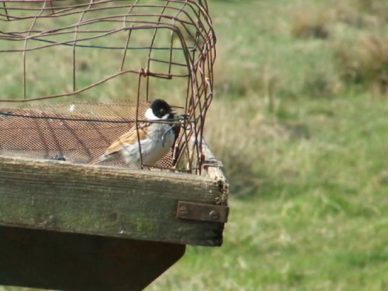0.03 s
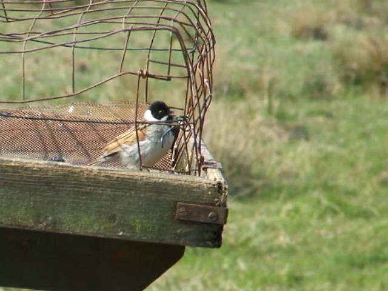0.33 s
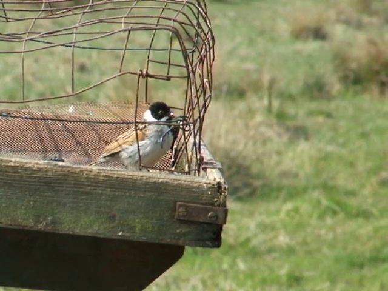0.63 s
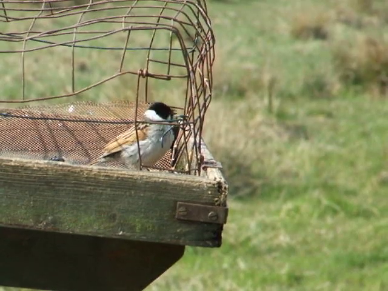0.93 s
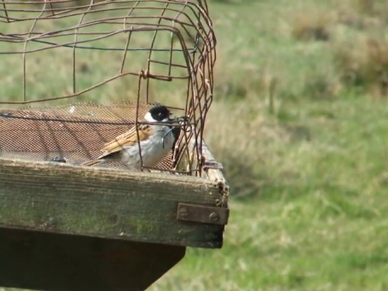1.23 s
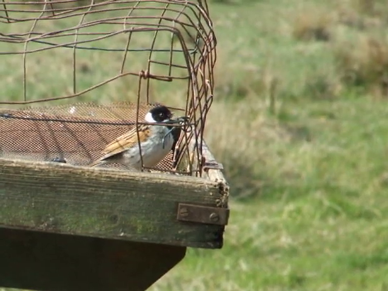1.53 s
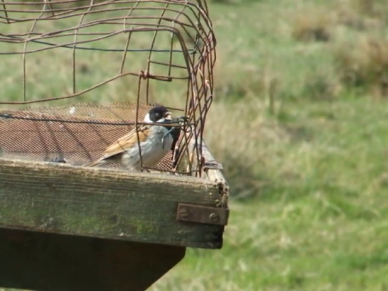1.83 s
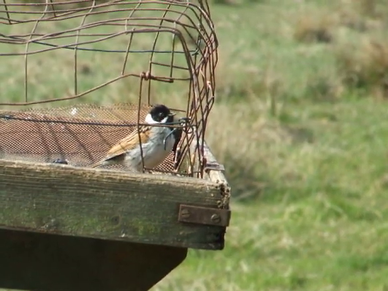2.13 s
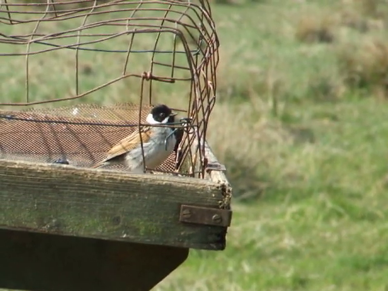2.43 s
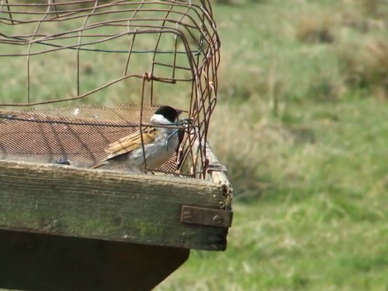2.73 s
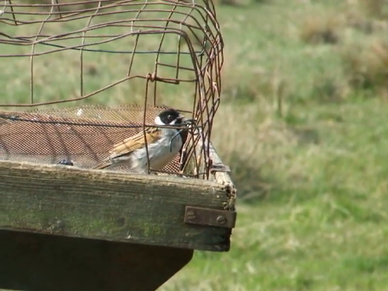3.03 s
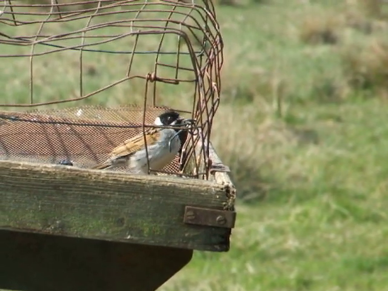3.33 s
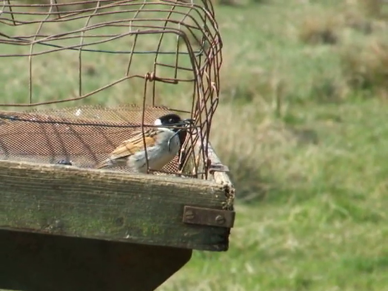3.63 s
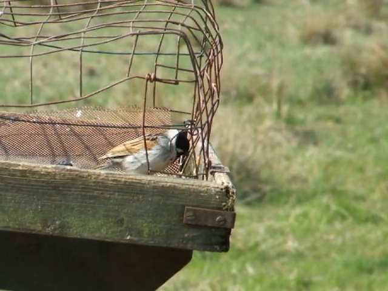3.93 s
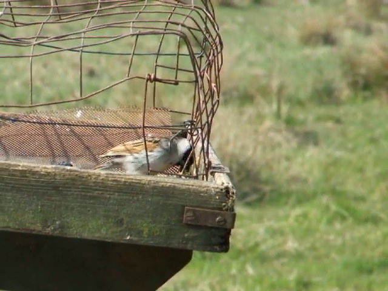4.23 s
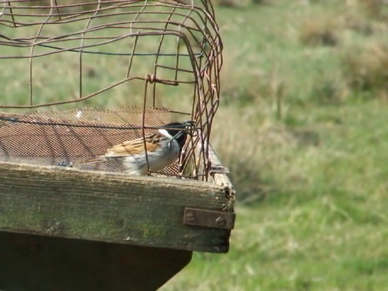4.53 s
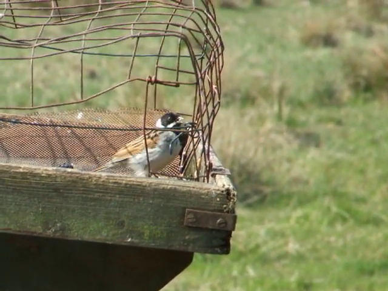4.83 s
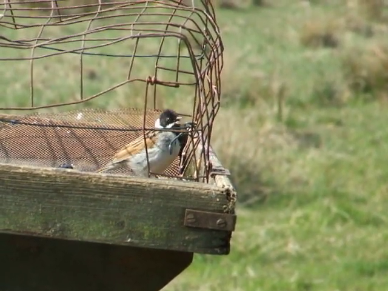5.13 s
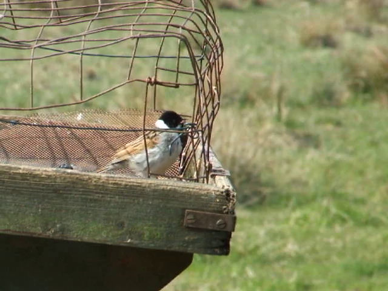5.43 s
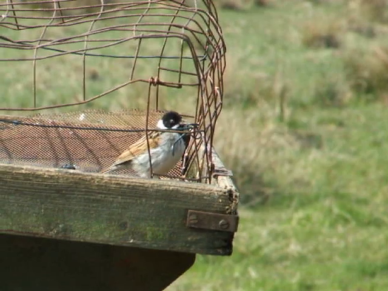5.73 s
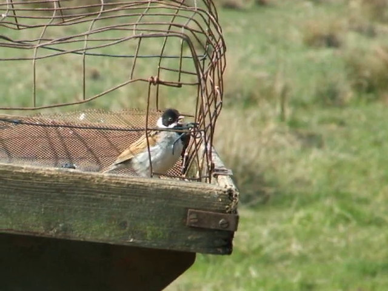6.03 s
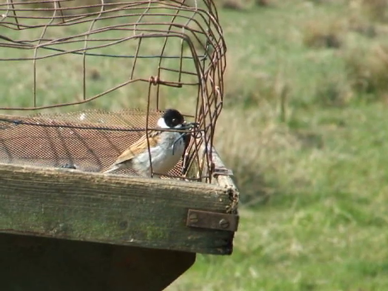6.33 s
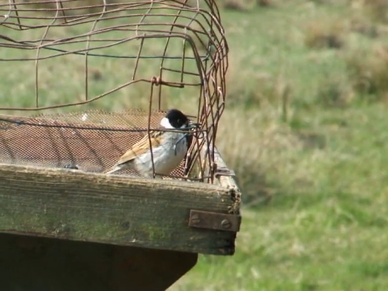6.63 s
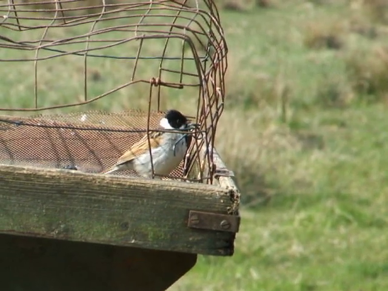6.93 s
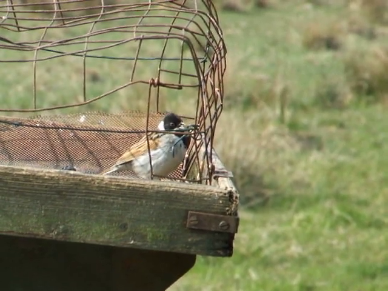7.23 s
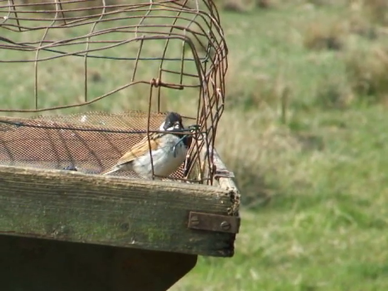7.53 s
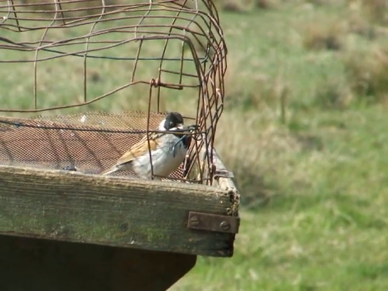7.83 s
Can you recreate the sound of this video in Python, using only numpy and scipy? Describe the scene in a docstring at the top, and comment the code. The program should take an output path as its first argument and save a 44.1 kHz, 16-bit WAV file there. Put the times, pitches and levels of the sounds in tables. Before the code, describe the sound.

In an open grassy field, a small bird sings high whistles, a fast trill and a run of rising notes, then a quieter phrase joined by a distant bird. A few short, dry taps sound near the microphone, the loudest at the very start and just before the middle. Low wind rumble swells and eases beneath a steady hiss, with a very faint high whine from the small camera.

```python
"""A small songbird sings across a pasture in frequency-modulated tones: thin whistles, a quick trill,
rising notes, then a softer phrase, joined by a farther bird. Ground and tussocks scatter the song.
Open air and dry grass give broadband noise, and light gusts rumble on the microphone. A few sharp taps,
damped impacts, sound close by. A small camera picks it all up with a narrow band, a faint electronic
whine and the quantisation hiss of a coarse converter."""
import sys
import numpy as np
from scipy import signal
from scipy.fft import rfft, irfft, next_fast_len
from scipy.io import wavfile
from scipy.ndimage import map_coordinates

SR = 44100
rng = np.random.default_rng(int(sys.argv[2]) if len(sys.argv) > 2 else 0)


def waveform_to_disk(signal):
    """Save audio, clipped to [-1, 1], as 16-bit WAV at the path in sys.argv[1]."""
    frames = np.transpose(np.atleast_2d(signal))
    scaled = np.clip(frames, -1, 1) * 32767
    samples = np.round(scaled).astype(np.int16)
    wavfile.write(sys.argv[1], SR, samples)


N = 347508

# The falling syllable of both trills, before stretching: time_s, pitch_hz, relative_db
SLUR_CONTOUR = [(0, 5347, -10), (.004, 4951, -5), (.0075, 4523, 4), (.014, 4214, 0), (.02, 4000, -7),
                (.026, 3902, -10)]


def amp(db):
    """Decibels to an amplitude ratio."""
    return 10 ** (np.asarray(db) / 20)


def unit(x):
    """Normalisation to rms 1."""
    return x / np.sqrt(np.mean(x ** 2) + 1e-20)


def along(points, hz):
    """Interpolation of (frequency_hz, value) points on a logarithmic frequency axis."""
    knots_hz, values = np.transpose(points)
    return np.interp(np.log(hz + 1), np.log(knots_hz + 1), values)


def curves(rows, size=N):
    """Linear interpolation, sample by sample, of each column after the time."""
    times, *columns = np.transpose(rows)
    return [np.interp(np.arange(size) / SR, times, column) for column in columns]


def wobble(rate_hz, size=N):
    """Smooth random modulation: a spline through rate_hz Gaussian values a second."""
    knots = rng.standard_normal(int(size * rate_hz / SR) + 4)
    return map_coordinates(knots, [np.arange(size) * rate_hz / SR])


def filtered(x, response):
    """Zero-phase filtering: the spectrum is multiplied by a frequency response."""
    size = next_fast_len(len(x) + 8192)
    return irfft(rfft(x, size) * response(np.fft.rfftfreq(size, 1 / SR)), size)[:len(x)]


def noise(spectrum):
    """White noise shaped to a spectrum, at rms 1."""
    return unit(filtered(rng.standard_normal(N), lambda hz: amp(along(spectrum, hz))))


def add(track, start_s, sound):
    """Superposition of a sound on a track."""
    part = track[max(round(start_s * SR), 0):][:len(sound)]
    part += sound[:len(part)]


def progress(length_s):
    """Normalised time, 0 to 1 over a note."""
    return np.linspace(0, 1, int(length_s * SR))


def field(still_db=-57):
    """Amplitude-modulated noise: the far rush of open air and the flicker of rustling dry grass."""
    # Spectra of the air and the grass: frequency_hz, relative_density_db
    air_spectrum = [(60, -20), (160, -1), (215, -7), (350, -2), (430, -6.5), (800, -1.5), (980, -2),
                    (1130, -4.5), (1400, -4.5), (1680, -13), (2250, -11), (3300, -21.5), (5500, -27),
                    (7900, -36.5)]
    grass_spectrum = [(1000, -32.5), (2200, 0), (3300, -1), (4500, 0), (5700, -0.5), (7200, 3.5),
                      (7900, 0.5)]
    # Their slow envelopes: time_s, relative_db
    rush_levels = [(0.0, -51.5), (1.56, -52.5), (5.64, -52), (6.67, -54), (7.88, -52.5)]
    rustle_levels = [(0.0, -53.5), (0.46, -53.5), (1.21, -52.5), (2.35, -53.5), (2.92, -50), (4.39, -54),
                     (5.05, -52), (6.71, -56), (7.88, -56.5)]
    rush = amp(curves(rush_levels)[0] + 2 + .3 * wobble(6)) * noise(air_spectrum)
    stir_power = np.maximum(amp(curves(rustle_levels)[0]) ** 2 - amp(still_db) ** 2, 0)
    rustle = np.sqrt(stir_power) * amp(2.5 + wobble(110)) * noise(grass_spectrum)
    return rush + rustle


def wind(eddy_db=1.1842, flutter_db=1.5):
    """Turbulent pressure on the microphone: breeze and gusts add in power; gusts buffet higher up."""
    # The breeze between gusts: time_s, level_db
    breeze_levels = [(0, -50.5), (.9, -51), (1.35, -47.5), (1.7, -49), (2.2, -46), (2.8, -48), (3.2, -46),
                     (3.7, -50), (4.2, -50), (4.6, -52), (5.2, -50), (6.1, -51), (6.9, -49), (7.88, -50)]
    # Gaussian gusts: peak_s, sigma_s, level_db
    gusts = [(1.338, 0.032, -50.5), (1.581, 0.0383, -51), (1.768, .05, -45), (1.959, .1, -43.5),
             (2.431, .035, -49), (2.581, .1, -56), (3.07, 0.04, -51.5), (3.328, 0.0477, -46),
             (3.425, 0.032, -43.5), (3.51, .015, -45.5)]
    # Spectra of the low rumble and the higher buffeting: frequency_hz, relative_density_db
    rumble_spectrum = [(10, 0.5), (25, -0.5), (55, 1), (100, -3), (140, -13.5), (220, -17.5), (400, -42),
                       (900, -82.5)]
    buffet_spectrum = [(40, -20.5), (100, -1.5), (180, -0.5), (280, -3.5), (390, -9), (500, -24),
                       (900, -37.5), (2000, -73)]
    t = np.arange(N) / SR
    breeze = amp(curves(breeze_levels)[0] + eddy_db * wobble(9))
    swells = (amp(db) * np.exp(-.5 * ((t - peak_s) / sigma_s) ** 2) for peak_s, sigma_s, db in gusts)
    gust = np.sqrt(sum(swell ** 2 for swell in swells))
    rumble = np.hypot(breeze, amp(-.5) * gust) * noise(rumble_spectrum)
    buffet = np.hypot(amp(-18) * breeze, gust) * amp(flutter_db * wobble(25)) * noise(buffet_spectrum)
    return rumble + buffet


def tone(hz, db, taper, waver=.0095, flutter_db=2.7):
    """A soft-ended sinusoid with slight random frequency and amplitude modulation."""
    size = len(hz)
    pitch_hz = hz * (1 + waver * wobble(400, size))
    flutter = unit(amp(flutter_db * wobble(260, size)))
    envelope = signal.windows.tukey(size, taper) * amp(db) * flutter
    return np.sqrt(2) * envelope * np.sin(2 * np.pi * np.cumsum(pitch_hz) / SR)


def whistles(crest=.36, settle=.29, scoop_s=.026):
    """Frequency modulation shapes the bird's single notes; crest and settle are shares of a note."""
    # Thin parabolic arches: start_s, length_s, top_hz, droop_hz, relative_db
    arches = [(.125, 0.1083, 7655, 617.2, -51.5), (.305, 0.0933, 7773, 722, -50),
              (0.439, .125, 7758, 620, -53.5), (3.908, .064, 7171, 852.2, -48.5),
              (4.554, .07, 7501, 150.8, -55.5), (4.745, 0.0655, 7097, 249.9, -47.5),
              (4.867, .09, 7130, 900.3, -49), (5.269, .125, 7565, 603.8, -52.5),
              (5.438, .12, 7638, 450, -57.5), (5.62, .1, 7590, 394.5, -58.5)]
    # Exponential falls towards a held pitch: start_s, length_s, held_hz, fall_hz, relative_db
    sighs = [(.598, 0.1085, 5098, 699.3, -48), (.888, 0.0794, 4282, 661.8, -47),
             (2.018, .095, 3763, 928.7, -49.5), (2.168, 0.0493, 5685, 1098, -45.5),
             (2.858, .1, 3751, 978.7, -47), (5.793, 0.09, 4994, 560, -55.5)]
    # Dips that climb again: start_s, length_s, first_hz, lowest_hz, last_hz, relative_db
    scoops = [(1.829, .128, 7450, 6402, 7026, -44.5), (3.005, .09, 7420, 6859, 7915, -43.5),
              (4.426, .056, 5950, 5737, 6304, -54)]
    # Linear sweeps, steep to nearly level: start_s, length_s, first_hz, last_hz, relative_db
    glides = [(.014, 0.0582, 3960, 4285, -49.5), (0.25, 0.024, 5210, 5231, -54.5),
              (0.731, .045, 6339, 6364, -43), (0.786, 0.0587, 6343, 6614, -45),
              (1.015, .049, 7143, 5400, -44.5), (3.19, .066, 6079, 4169, -46.5),
              (4.007, .039, 5807, 4100, -48.5), (4.388, .025, 5400, 4692, -55),
              (4.666, .06, 4259, 4162, -58), (4.78, .055, 4322, 4290, -54), (4.82, .045, 6026, 5938, -57.5),
              (5.104, .067, 5980, 6127, -55), (5.184, .05, 4025, 4226, -55), (5.405, .045, 4860, 5380, -55)]
    song = np.zeros(N)
    for start_s, length_s, top_hz, droop_hz, db in arches:
        u = progress(length_s)
        pitch_hz = top_hz - droop_hz * ((u - crest) / (1 - crest)) ** 2
        add(song, start_s, tone(pitch_hz, db + 6 * (u - .5), taper=.3))
    for start_s, length_s, held_hz, fall_hz, db in sighs:
        u = progress(length_s)
        pitch_hz = held_hz + fall_hz * np.exp(-u / settle)
        add(song, start_s, tone(pitch_hz, db - 2 * (u - .5), taper=.2, waver=.009))
    for start_s, length_s, first_hz, lowest_hz, last_hz, db in scoops:
        u, bottom = progress(length_s), scoop_s / length_s
        dip_hz = np.interp(u, [0, bottom], [first_hz, lowest_hz])
        climb_hz = (last_hz - lowest_hz) * np.interp(u, [bottom, 1], [0, 1]) ** .7
        add(song, start_s, tone(dip_hz + climb_hz, db - 4 * (u - .5), taper=.18))
    for start_s, length_s, first_hz, last_hz, db in glides:
        u = progress(length_s)
        pitch_hz = first_hz + (last_hz - first_hz) * u
        add(song, start_s, tone(pitch_hz, db + 3 * (u - .5), taper=.3, waver=.014))
    return amp(-2.5) * song


def scatter(x, t60_s, wet_db, early_db, paths=8):
    """Multipath scattering off ground and tussocks: reflections waver in the breeze, then a tail decays."""
    t = np.arange(SR // 2) / SR
    tail = rng.standard_normal(len(t)) * amp(-60 * t / t60_s) * (1 - np.exp(-t / .004))
    delays_s = rng.uniform(.001, .014, paths)
    early = sum(np.pad(x, (int(delay * SR), 0))[:N] * wobble(8) for delay in delays_s) / np.sqrt(paths)
    diffuse = signal.fftconvolve(x, tail / np.linalg.norm(tail))[:N]
    return x + amp(early_db) * early + amp(wet_db) * diffuse


def taps(snap_t60_s=.00555, attack_s=.00031):
    """Impact excitation: each tap is a noisy crack, briefly ringing modes and a dull knock."""
    # Impacts: start_s, relative_db, bright_hz, spread_octaves, t60_s, relative_knock_db
    impacts = [(0.0696, -20.5, 3800, 0.88, 0.0263, -2.5), (2.852, -41, 2600, 0.93, 0.023, 3.5),
               (3.4078, -26.5, 3237, 0.616, 0.017, -8.5), (3.645, -39.5, 5500, 1.1, 0.027, -15.5),
               (4.463, -46.5, 3600, 1, 0.018, -15.5), (5.063, -43, 3995, 0.46, 0.017, -16),
               (5.372, -44.5, 1200, 0.67, 0.012, 7), (5.686, -42.5, 4200, 0.59, 0.02, -16),
               (7.64, -32, 1500, 1.7, 0.018, 3.5)]
    # Ringing modes, each a sinusoid with its band's power: pitch_hz, width_hz, relative_density_db
    ring_modes = [(1983, 61, 5), (2439, 52, -5), (2586.4, 140, 0.5), (3145, 170, -1.5), (3597, 170, -4.5),
                  (4850, 170, -3), (5427, 120, -19), (6358, 130, -5), (7276, 250, -2)]
    # Damped modes of the knock: pitch_hz, relative_db, t60_s
    knock_modes = [(411.8, 2.5, 0.0146), (655.4, -1.5, 0.016), (850.2, -3, 0.021), (1134, -19.5, .014),
                   (1726, -6.5, 0.016)]
    track, t = np.zeros(N), np.arange(SR // 10) / SR
    knock = sum((-1) ** k * amp(db - 60 * t / t60_s) * np.sin(2 * np.pi * hz * t)
                for k, (hz, db, t60_s) in enumerate(knock_modes))
    attack = 1 - np.exp(-t / attack_s)
    for start_s, db, bright_hz, spread, t60_s, knock_db in impacts:
        ring = unit(sum(amp(density_db) * np.sqrt(width_hz) * np.sin(2 * np.pi * (hz * t + rng.random()))
                        for hz, width_hz, density_db in ring_modes))
        crack = amp(1) * rng.standard_normal(len(t))
        band = lambda hz: np.exp(-.5 * (np.log2((hz + 1) / bright_hz) / spread) ** 2)
        contact = unit(filtered(ring + crack, band))
        # the instant of contact stands above the decay that follows
        decay = amp(-3.5 - 60 * t / t60_s) + amp(-60 * t / snap_t60_s)
        add(track, start_s, amp(db) * (contact * decay + amp(knock_db - 3) * knock) * attack)
    return track


def syllable(contour, db, stretch=1):
    """A tone follows a time-scaled contour, slightly detuned at each repetition."""
    rows = np.array(contour) * [stretch, 1, 1]
    pitch_hz, contour_db = curves(rows, int(rows[-1, 0] * SR))
    detuning = 1 + .0062 * rng.standard_normal()
    return tone(pitch_hz * detuning, db + contour_db, taper=.086)


def pulse_train(start_s, period_s, middle_db, edge_db, count):
    """Periodic onsets with levels on a parabola, so that a trill swells and fades."""
    onsets_s = start_s + period_s * np.arange(count)
    return zip(onsets_s, middle_db + edge_db * np.linspace(-1, 1, count) ** 2)


def trill(pinch_s=1.44, pinch_width_s=.15):
    """A periodic train of down-slurs whose duty cycle and level dip halfway through."""
    song = np.zeros(N)
    for start_s, db in pulse_train(1.094, period_s=.0599, middle_db=-41, edge_db=-5.5, count=12):
        pinch = np.exp(-((start_s - pinch_s) / pinch_width_s) ** 2)
        add(song, start_s, syllable(SLUR_CONTOUR, db - 3.5 * pinch, stretch=1.17 - .63 * pinch))
    return song


def rising_notes():
    """A frequency jump: each note holds its pitch, leaps upward and goes on climbing."""
    # The contour of one note: time_s, pitch_hz, relative_db
    leap_contour = [(0, 4330, -6), (.012, 4330, -1.5), (.024, 4357, -3.5), (.029, 5229, -1.5),
                    (.037, 5830, -1), (.052, 6050, -3.5), (.072, 6156, -3.5), (.095, 6294, -11.5)]
    # Its repetitions: start_s, relative_db
    leaps = [(2.238, -50.5), (2.392, -48.5), (2.542, -50), (2.697, -48)]
    song = np.zeros(N)
    for start_s, db in leaps:
        add(song, start_s, syllable(leap_contour, db))
    return song


def far_bird(jitter_s=.0077):
    """A low direct-to-reverberant ratio melts a distant bird's trill into its echoes."""
    song = np.zeros(N)
    for start_s, db in pulse_train(4.72, period_s=.062, middle_db=-61, edge_db=-2.5, count=11):
        add(song, start_s + jitter_s * rng.standard_normal(), syllable(SLUR_CONTOUR, db))
    return scatter(song, t60_s=.35, wet_db=.5, early_db=-4)


def scene():
    """Superposition of birds, taps, wind and field at one microphone."""
    song = whistles() + trill() + rising_notes()
    bird = amp(-1.64) * scatter(song, t60_s=.26, wet_db=-4.5, early_db=-7)
    close_taps = scatter(taps(), t60_s=.1, wet_db=-17.5, early_db=-22)
    return (bird + far_bird() + close_taps + wind() + field())[None]


def record(dry):
    """The camera adds its whine; quantisation makes hiss, and spectral imaging mirrors the top treble."""
    # Tones of the electronic whine: pitch_hz, relative_db
    whine_tones = [(7822, -101), (7852, -71), (7882, -70.5), (7912, -93.5)]
    # The camera's low-pass response: frequency_hz, gain_db
    roll_off = [(7300, 0), (7700, -2.5), (8000, -5.5), (8400, -13.5), (8800, -26), (9000, -38.5)]
    sampling_hz, top_hz = 16000, 9050
    step = .0059  # of the converter, as a share of full scale
    t = np.arange(N) / SR
    whine = sum(np.sqrt(2) * amp(db) * np.sin(2 * np.pi * hz * t) for hz, db in whine_tones)
    samples = signal.resample(dry[0] + amp(-.5) * whine, round(N * sampling_hz / SR))
    quantised = step * (np.floor(samples / step) + .5)
    baseband = signal.resample(quantised, N)
    mirrored = baseband * (1 + 2 * np.cos(2 * np.pi * sampling_hz * t))
    return filtered(mirrored, lambda hz: amp(along(roll_off, hz)) * (hz < top_hz))[None]


dry = scene()
out = record(dry)
waveform_to_disk(out)
```